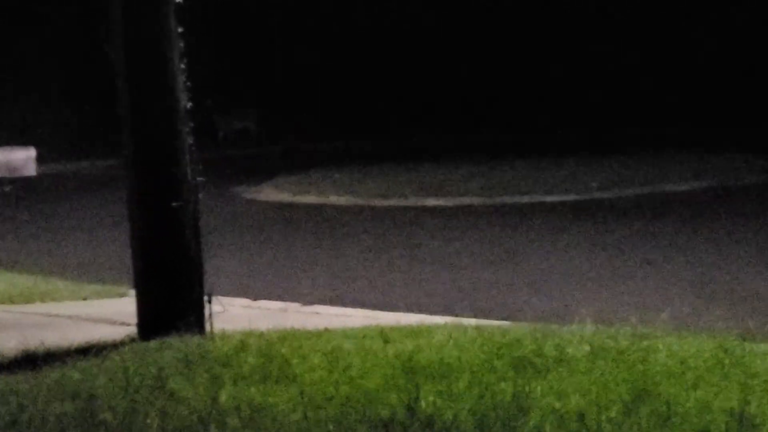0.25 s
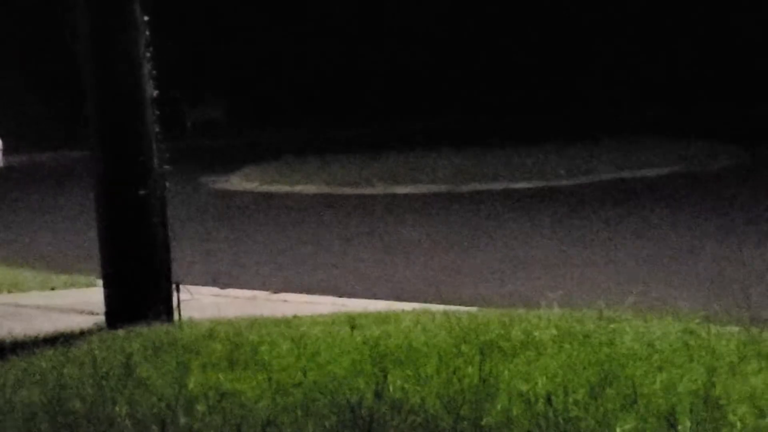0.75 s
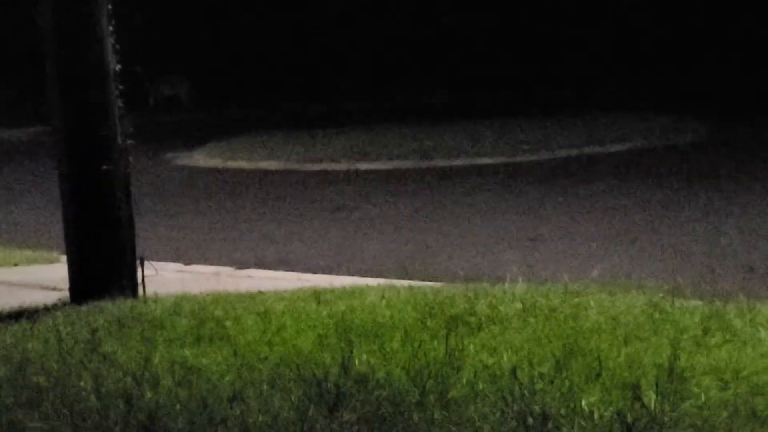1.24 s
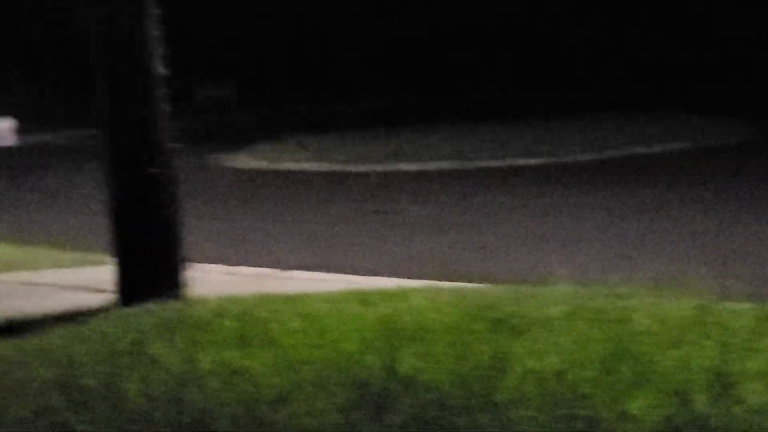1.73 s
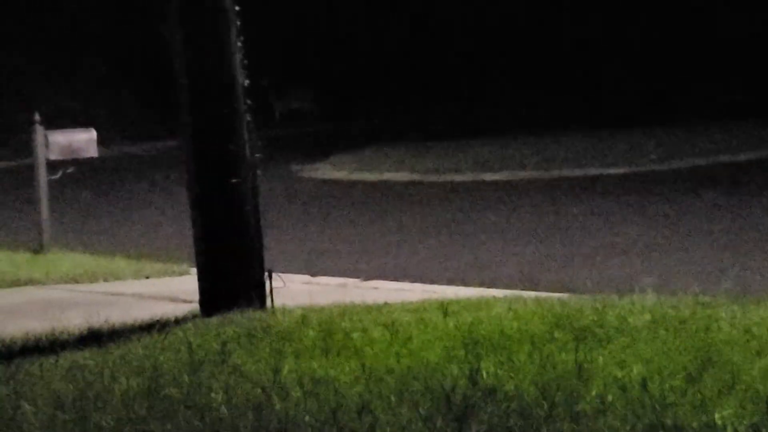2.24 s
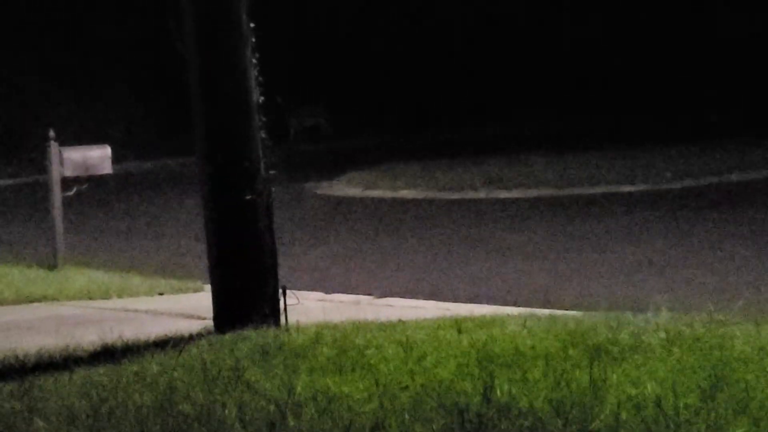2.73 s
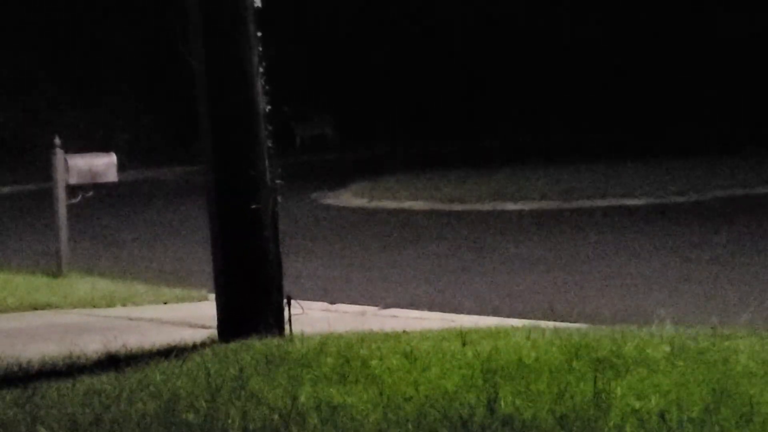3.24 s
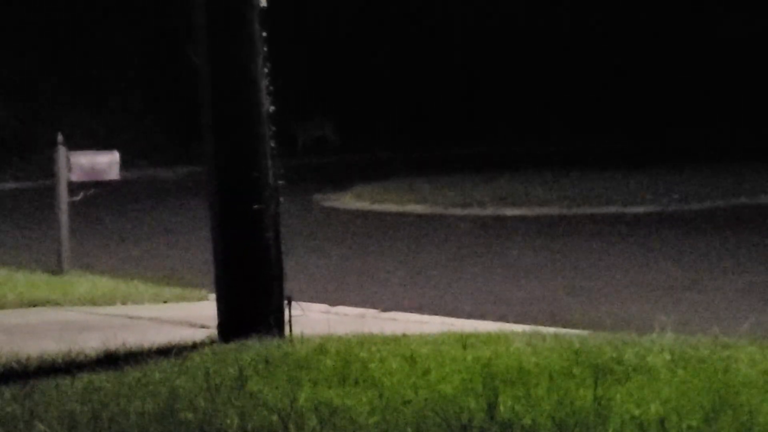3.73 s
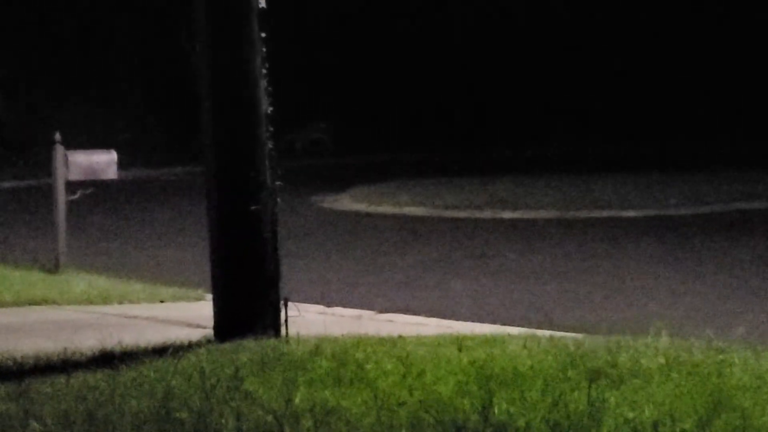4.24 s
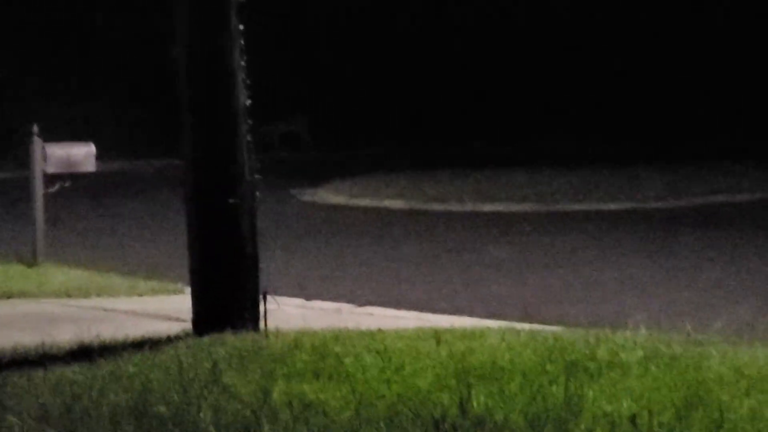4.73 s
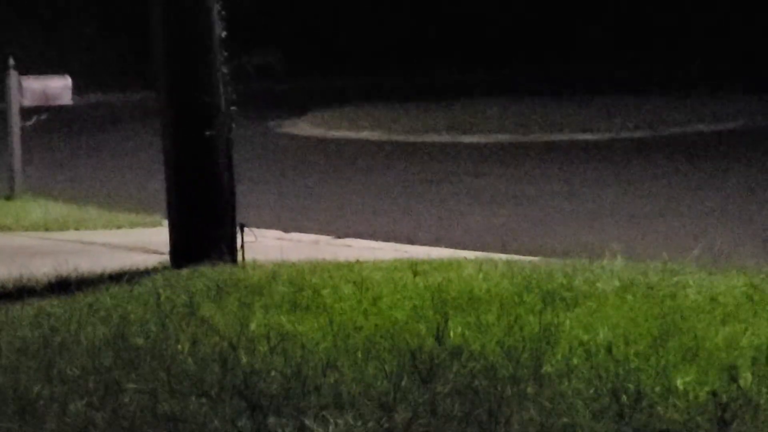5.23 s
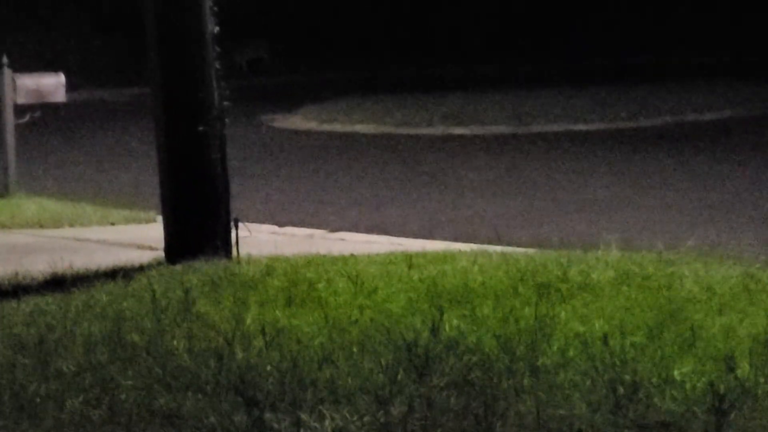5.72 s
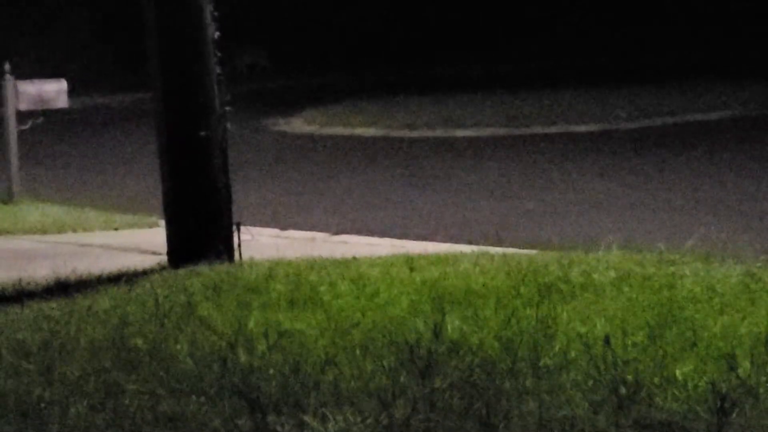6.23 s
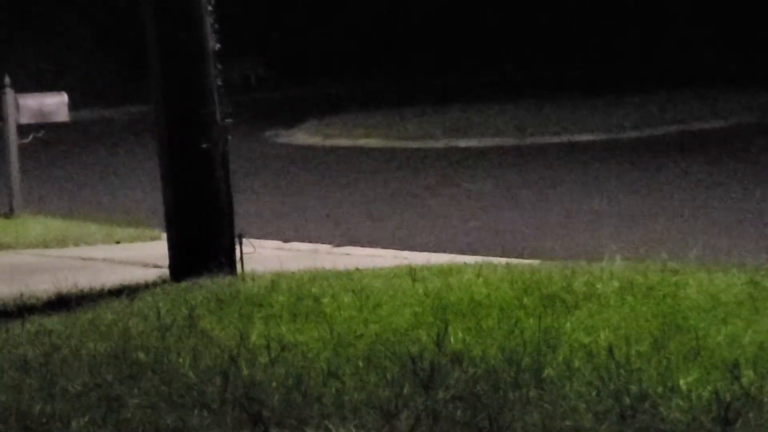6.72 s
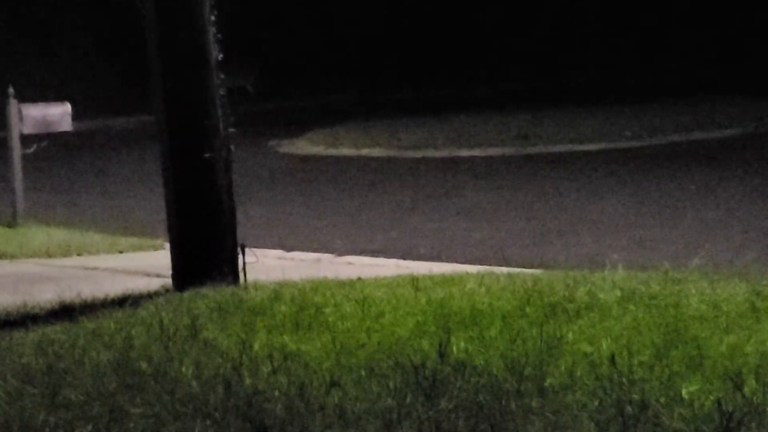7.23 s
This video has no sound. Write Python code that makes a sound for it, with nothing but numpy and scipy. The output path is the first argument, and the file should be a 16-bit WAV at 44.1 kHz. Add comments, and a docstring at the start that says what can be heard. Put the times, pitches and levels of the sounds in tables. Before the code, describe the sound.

A suburban street at night, heard in stereo through a handheld camera. Throughout about 7.5 seconds, dense crickets trill: a low purr leaning right, a louder shrill layer swelling roughly twice a second, and faint high sizzle leaning left. A tree katydid gives coarse double rasps at about 0.7, 1.6, 2.5, 3.5, 4.3, 5.1, 6.0 and 7.1 s, blurred by echoes from trunks and houses. Thin ticks at 0.2 s lead into a fluttering high buzz at left until 1.8 s; ticks return near 7.2 s. A sharp handling click falls at 0.6 s, smaller knocks at 0.1, 5.3, 5.5 and 6.4 s, with a soft bump. Low traffic rumble slowly grows; an engine rises in pitch from 4 to 5.5 s. A wavering air conditioner hum swells around 6.4 s. A lone cricket chirps at right at 3.8 and 5.9 s; quick lisps run from 6.0 to 6.3 s.

```python
"""A suburban street at night. From the start, choirs of crickets trill in trees and lawns as pulsed tones, over
far traffic (shaped noise, one engine) and an air conditioner (wavering tones). Small katydids tick and buzz
close by, leaning left; a tree katydid rasps in pairs of strokes about once a second; the hand-held camera
clicks a few times. Later a lone cricket chirps at the right and a bush katydid lisps, leaning left.
Katydid wings are noise bursts, one for each file tooth; echoes from trunks and houses spread the insects."""
import sys
import numpy as np
from scipy import signal
from scipy.fft import rfft, irfft, next_fast_len
from scipy.io import wavfile
from scipy.ndimage import map_coordinates

SR = 44100
rng = np.random.default_rng(int(sys.argv[2]) if len(sys.argv) > 2 else 0)


def unload_audio(sound):
    """Save the sound as a 16-bit wav file, at the path given as the first command line argument."""
    columns = np.transpose(np.atleast_2d(sound))
    # keep every value between -1 and 1, then stretch to whole-number steps
    steps = np.round(np.clip(columns, -1, 1) * 32767)
    wavfile.write(sys.argv[1], SR, steps.astype(np.int16))


N = 329427

# tilt of the microphone pair, positive to the left: pitch_hz, left_over_right_db
MICROPHONE_TILT = [(1500, 4), (3000, -4), (4400, -3.5), (6500, 3), (9000, 4), (11000, 9), (15000, 19)]


def amp(db):
    """Decibels to gain."""
    return 10 ** (np.asarray(db) / 20)


def unit(x):
    """Scale to rms 1."""
    return x / np.sqrt(np.mean(x ** 2) + 1e-20)


def clock():
    """Seconds at each sample."""
    return np.arange(N) / SR


def along(points, hz):
    """Read a curve of (Hz, value) points on a log frequency axis."""
    f, v = np.transpose(points)
    return np.interp(np.log(hz + 1), np.log(f + 1), v)


def curves(rows):
    """One value per sample for each column after the time."""
    s, *cols = np.transpose(rows)
    return [np.interp(clock(), s, c) for c in cols]


def wobble(rate):
    """A smooth random curve, rate knots a second."""
    coarse = np.linspace(0, N / SR, 2000)
    knots = rng.standard_normal(1024)
    return np.interp(clock(), coarse, map_coordinates(knots, [coarse * rate], mode="wrap"))


def filtered(x, response):
    """Shape the spectrum of x by a response of frequency."""
    m = next_fast_len(N + SR // 2)
    return irfft(rfft(x, m) * response(np.fft.rfftfreq(m, 1 / SR)), m)[..., :N]


def pan(lean_db):
    """Left and right gains of mean power 1; a positive lean is to the left."""
    gains = np.array([amp(lean_db / 2), amp(-lean_db / 2)]).reshape(2, -1)
    return gains / np.sqrt(np.mean(gains ** 2, axis=0))


def tilted_noise(colour):
    """Coloured noise, independent in each ear, leaning as the microphones do at each pitch."""
    noise = rng.standard_normal((2, N))
    return filtered(noise, lambda hz: amp(along(colour, hz)) * pan(along(MICROPHONE_TILT, hz)))


def trees(x, t60, wet_db):
    """The direct sound plus its decaying scatter from trunks and houses, different at each ear."""
    t = np.arange(SR // 2) / SR
    tail = rng.standard_normal((2, len(t))) * amp(-60 * t / t60)
    tail *= amp(wet_db) / np.linalg.norm(tail[0])
    tail[:, 0] += 1  # the direct sound
    return signal.fftconvolve(np.atleast_2d(x), tail / np.linalg.norm(tail[0]), axes=1)[:, :N]


def choir(pitch_hz, spread_hz, rate, db, lean_db, sag, scatter, wet_db, count):
    """Each cricket has its own pitch and rate; its tone sags in a wing stroke and starts afresh with the next."""
    bushes = np.zeros((3, 2, N), np.float32)
    rank = (np.arange(count) + .5) / count
    offsets = np.log(rank / (1 - rank)) * np.sqrt(3) / np.pi  # bell-shaped spread of pitches
    for i, offset in enumerate(offsets):
        pace, start, lag = rng.standard_normal(3)
        effort = wobble(1.5)
        strokes = np.cumsum(rate * (1 + .12 * pace + .03 * effort)) / SR + start
        index = np.floor(strokes).astype(int)
        cycle = strokes - index
        slip, force = rng.standard_normal((2, 1024))  # one value per stroke
        hz = pitch_hz * (1 + .004 * effort - sag * (cycle - .35)) + spread_hz * offset
        # sound fills the first 68 % of each stroke cycle
        pulse = np.sin(np.pi * np.minimum(cycle / 0.68, 1).astype(np.float32))
        pulse = pulse * amp(2.94 * force).take(index, mode="wrap")
        turns = np.cumsum(hz) / SR + scatter * slip.take(index, mode="wrap")
        phase = (2 * np.pi * (turns - np.floor(turns))).astype(np.float32)
        ears = np.array([np.sin(phase), np.sin(phase + np.float32(np.pi * lag))])
        bushes[i % len(bushes)] += pulse * ears
    heard = sum(trees(bush, t60=0.39, wet_db=wet_db) for bush in bushes)  # each bush has its own echoes
    return amp(db) * pan(lean_db) * unit(heard)


def swell_db():
    """The field crickets swell in step: rounded swells at an even beat, parted by short lulls."""
    first_lull_s, period_s, lull_db, wander_db = .17, .549, -3, .5
    sharpness = 1.2  # larger = flatter swells, shorter lulls
    arch = np.abs(np.sin(np.pi * (clock() - first_lull_s) / period_s))
    return lull_db * (1 - arch) ** sharpness + wander_db * wobble(7.3)


def crickets():
    """Tree crickets purr, field crickets swell together above them, ground crickets sizzle on top."""
    # choirs: pitch_hz, spread_between_animals_hz, pulses_per_s, level_db, left_over_right_db
    tree_choir = (2812, 62, 44, -50.5, -4.5)
    field_choir = (5335, 160, 60, -47.5, -1.6)  # level_db is before the swells
    ground_choirs = [(6523, 210, 74, -62, 10), (6903, 57, 70, -67.5, -5), (8640, 170, 73, -68.5, 2.5),
                     (9140, 110, 67, -69.5, 6.5), (9760, 60, 70, -72.5, 2.5)]
    # colour of countless far insects: pitch_hz, density_db_per_hz
    far_colour = [(1200, -7.5), (1900, -14), (2400, 7), (2600, 6), (3100, 8), (3350, -7.5), (3800, -40),
                  (4300, -9), (4900, 6.5), (6000, 3), (6900, -6), (7500, -17.5), (9500, -9), (11000, -26.5),
                  (16000, -26)]
    low = choir(*tree_choir, sag=.035, scatter=.3, wet_db=-1, count=10)
    shrill = amp(swell_db()) * choir(*field_choir, sag=.03, scatter=0.32, wet_db=-2.0, count=16)
    high = sum(choir(*row, sag=.025, scatter=0.25, wet_db=2, count=4) for row in ground_choirs)
    far = amp(-54.5 + 2.5 * wobble(6.7)) * unit(tilted_noise(far_colour))
    return low + shrill + high + far


def traffic():
    """Far roads rumble as noise, nearly alike in both ears at low pitches; one engine climbs in pitch."""
    # rumble of the roads: pitch_hz, density_db_per_hz
    road_colour = [(15, -41), (25, -16), (33, -22), (43, -5.5), (56, 1.5), (76, -2), (92, -7), (135, -3),
                   (180, -3.5), (250, -14.5), (320, -18.5), (500, -15.5), (800, -22.5), (1300, -31.5),
                   (2000, -36.5), (3200, -70)]
    # likeness of the two ears: pitch_hz, left_right_correlation
    ear_likeness = [(60, 0.855), (130, 1), (290, 0.883), (640, 0.042), (1400, -0.295), (3100, 0.45)]
    # a car pulls away: time_s, firing_hz, level_db
    engine_course = [(3.6, 45, -55), (4.3, 50.55, -44), (4.7, 57.2, -44), (5.2, 70.7, -44),
                     (5.7, 73.6, -62)]
    road_db, grows_db_per_s, wander_db = -42, 0.25, 0.83  # the traffic slowly draws nearer

    def mid_and_side(hz):
        turn = np.arccos(np.clip(along(ear_likeness, hz), -1, 1)) / 2
        return amp(along(road_colour, hz)) * [np.cos(turn), np.sin(turn)]

    mid, side = filtered(rng.standard_normal((2, N)), mid_and_side)
    level_db = road_db + grows_db_per_s * clock() + wander_db * wobble(5)
    roar = amp(level_db) * unit(np.array([mid + side, mid - side]))
    firing_hz, engine_db = curves(engine_course)
    phase = 2 * np.pi * np.cumsum(firing_hz * (1 + 0.0186 * wobble(9))) / SR
    engine = amp(engine_db + 2.5 * wobble(8)) * unit(np.sin(phase) + .4 * np.sin(3 * phase))
    return pan(1.64) * (roar + engine)


def stroke(middle, length):
    """A smooth rise and fall, as when a wing closes."""
    return np.cos(np.pi * np.clip((clock() - middle) / length, -.5, .5))


def tyres():
    """A faint rush of noise that swells between the houses."""
    # swells of the rush: middle_s, length_s, level_db
    passes = [(3.7, .4, -63.5), (4.35, 0.42, -64), (5.0, 2.9, -63.5), (5.554, 0.31, -64),
              (6.84, .25, -58.5)]
    # colour of the rush: pitch_hz, density_db_per_hz
    rush_colour = [(500, -19), (900, -18), (1200, -5), (1500, -13), (2200, -9), (3200, -37)]
    floor_db = -70  # the rush between passes
    level = amp(floor_db) + sum(amp(db) * stroke(s, length) ** 2 for s, length, db in passes)
    noise = rng.standard_normal((2, N))
    return level * unit(filtered(noise, lambda hz: amp(along(rush_colour, hz))))


def air_conditioner():
    """Motor and fan tones waver on their way across the street, with one swell."""
    # tones of the machine: pitch_hz, relative_level_db
    machine_tones = [(139.95, -0.5), (77.55, -11.5), (662, -22.5), (1530, -34.5), (2387, -26.5)]
    hum_db, swell_gain_db, swell_at_s, swell_s = -47.5, 6.5, 6.41, 2.2
    tones = 0
    for hz, db in machine_tones:
        phase = 2 * np.pi * hz * clock() + 1.29 * wobble(7)
        tones = tones + amp(db + 1.6 * wobble(6)) * np.sin(phase)
    return amp(hum_db + swell_gain_db * stroke(swell_at_s, swell_s) ** 2) * unit(tones)


def scrape(wing, teeth_hz, depth):
    """A scraper runs over file teeth; each tooth shakes the wing with a burst of noise."""
    teeth = np.cumsum(teeth_hz * (1 + .1 * wobble(20))) / SR % 1
    bursts = np.exp(-depth * teeth) * rng.standard_normal((2, N))
    return unit(filtered(bursts, lambda hz: amp(along(wing, hz)) * pan(along(MICROPHONE_TILT, hz))))


def run_of(first, gap, length, grows_db, count):
    """Evenly spaced wing strokes, each changed in level by grows_db from the one before."""
    return sum(amp(grows_db * k) * stroke(first + k * gap, length) for k in range(count))


def held(start, end):
    """A buzz rises, holds and falls; it is at half height at its start and end times."""
    fade_s = .15
    return np.clip(np.minimum(clock() - start, end - clock()) / fade_s + .5, 0, 1)


def meadow_katydid():
    """Thin ticks run into a fluttering buzz; the buzzes of far ones blur to a sizzle."""
    # buzzes of others far off: start_s, end_s, level_db
    far_buzzes = [(0, 1.0, -64), (1.7, 3.7, -69.5), (7.0, 7.5, -69)]
    # runs of ticks: middle_of_first_s, ticks, level_of_first_db
    tick_runs = [(.158, 5, -59), (7.19, 3, -64)]
    # colour of the wing: pitch_hz, density_db_per_hz
    thin_wing = [(9000, -27), (11500, -13), (13500, -3.5), (15000, 1), (16000, -9)]
    gap_s, tick_s, tick_grows_db = .096, 0.0234, 1.4  # from tick to tick, length of one, gain with each
    start_s, end_s, start_db, grows_db_per_s = 0.45, 1.803, -66, 5  # the buzz gathers strength, then stops
    uneven_db = 1.2  # no two flutters are equally strong
    sizzle_db = -71.5  # the farthest ones, steady
    ticks = sum(amp(db) * run_of(s, gap_s, tick_s, tick_grows_db, count=round(n)) for s, n, db in tick_runs)
    flutter = unit(1 + .68 * np.cos(2 * np.pi * 31.9 * (clock() - 1.182)))
    effort_db = start_db + grows_db_per_s * (clock() - start_s) + uneven_db * wobble(30.2)
    buzz = amp(effort_db) * held(start_s, end_s) * flutter
    far = sum(amp(db) * held(start, end) for start, end, db in far_buzzes)
    level = np.sqrt(ticks ** 2 + buzz ** 2 + far ** 2 + amp(sizzle_db) ** 2)
    wings = level * scrape(thin_wing, teeth_hz=1060, depth=1.3)
    return trees(wings, t60=.2, wet_db=-12)


def tree_katydid():
    """Coarse double rasps from up in a tree, about once a second; far ones join in around each call."""
    # calls of two wing strokes: middle_of_first_s, level_db
    calls = [(.69, -51.5), (1.63, -50), (2.525, -50.5), (3.51, -50), (4.25, -49), (5.12, -50), (6.04, -49),
             (7.055, -51)]
    # colour of the wing: pitch_hz, density_db_per_hz
    coarse_wing = [(1700, -26), (2100, 7), (2600, -2.5), (3300, 5), (3800, -5.5), (4350, 2.5), (5500, 1),
                   (7500, -34), (11000, -20.5), (15000, -10.5)]
    gap_s, rasp_s, second_db = 0.13, .15, 0  # from stroke to stroke, length of one, second over first
    neighbours_db, neighbours_s = -19, 0.76  # far ones around each call: level relative to it, span
    strokes, neighbours = 0, 0
    for s, db in calls:
        pair = stroke(s, rasp_s) ** 2 + amp(second_db) * stroke(s + gap_s, rasp_s) ** 2
        strokes = strokes + amp(db) * pair
        neighbours = neighbours + amp(db + neighbours_db) * stroke(s + gap_s / 2, neighbours_s) ** 2
    answers = amp(-77 + 11.6 * np.tanh(wobble(7)))  # come and go at random throughout
    level = np.sqrt(strokes ** 2 + neighbours ** 2 + answers ** 2) * amp(1.8 * wobble(60))
    teeth = scrape(coarse_wing, teeth_hz=150, depth=3)
    return trees(level * teeth, t60=0.36, wet_db=-0.5)


def ring(hz, t60):
    """One decaying mode, struck softly enough to rise within a cycle."""
    t = np.arange(SR // 10) / SR
    return np.sin(2 * np.pi * hz * t) * (1 - np.exp(-2 * np.pi * hz * t)) * np.exp(-np.log(1000) * t / t60)


def handling():
    """Fingers knock the camera's case, whose modes die at once; the hand bumps it once."""
    # knocks: time_s, strike_db, pitch_hz, t60_s
    knocks = [(.130, -36, 497, 0.0171), (0.5898, -18, 2163, 0.0044), (5.348, -31, 580, 0.014),
              (5.53, -40, 560, 0.018), (6.4, -44, 556, 0.011)]
    # modes of the case: multiple_of_pitch, relative_level_db
    case_modes = [(.45, -4.5), (.78, -2), (1.03, 1), (1.5, -6.5), (2.05, -6.5)]
    # soft bump of the hand: time_s, strike_db, pitch_hz, t60_s
    bump = (6.433, -27.5, 109, 0.2)
    out = np.zeros(N)
    for s, db, hz, t60 in knocks:
        knock = sum((-1) ** i * amp(level) * ring(hz * k, t60) for i, (k, level) in enumerate(case_modes))
        out[round(s * SR):][:len(knock)] += amp(db) * knock
    s, db, hz, t60 = bump
    thud = ring(hz, t60)
    out[round(s * SR):][:len(thud)] -= amp(db) * thud
    return out


def lone_cricket():
    """A few chirps from the right, each a pure tone under one smooth stroke."""
    # chirps: middle_s, length_s, pitch_hz, level_db (before the pan)
    chirps = [(3.804, 0.022, 3060, -42.5), (3.823, .028, 3110, -49), (3.84, 0.024, 3120, -53),
              (5.882, .028, 3180, -41.5), (5.93, 0.0285, 3100, -47)]
    tone = sum(amp(db) * stroke(s, length) * np.sin(2 * np.pi * hz * clock()) for s, length, hz, db in chirps)
    return pan(-19) * trees(tone, t60=.25, wet_db=-14)


def bush_katydid():
    """A trial stroke, then a quick run of high lisping ones, rough from the teeth of the file."""
    # runs of strokes: middle_of_first_s, strokes, level_db
    lisp_runs = [(5.761, 1, -64), (5.991, 6, -52)]
    # colour of the wing: pitch_hz, density_db_per_hz
    lisping_wing = [(6000, -16.5), (8000, -0.5), (10500, 0), (13000, -1), (15700, -10)]
    gap_s, lisp_s = .068, 0.081  # from stroke to stroke, length of one
    strokes = sum(amp(db) * run_of(s, gap_s, lisp_s, 0, count=round(n)) ** 2 for s, n, db in lisp_runs)
    wings = amp(0.75 * wobble(90)) * strokes * scrape(lisping_wing, teeth_hz=740, depth=1.5)
    return trees(wings, t60=.25, wet_db=-2)


def scene():
    """Insects all around, over the drone of the town."""
    town = traffic() + tyres() + air_conditioner()
    insects = crickets() + meadow_katydid() + tree_katydid() + lone_cricket() + bush_katydid()
    return insects + town + handling()


def record(dry):
    """The camera keeps nothing above its band limit."""
    top_hz = 15800
    return filtered(dry, lambda hz: hz < top_hz)


dry = scene()
out = record(dry)
unload_audio(out)
```